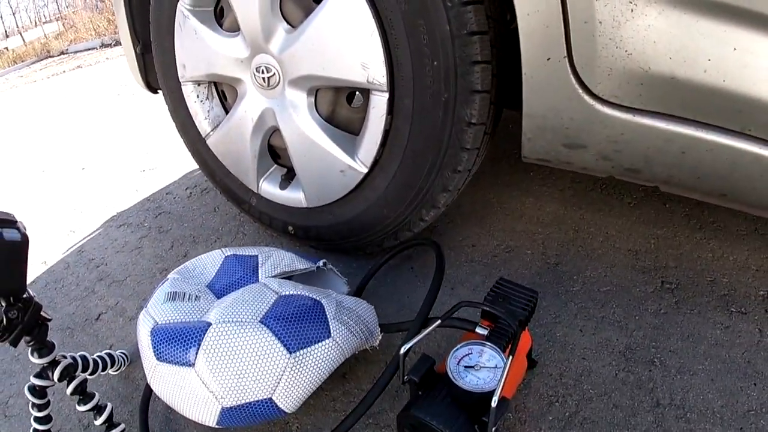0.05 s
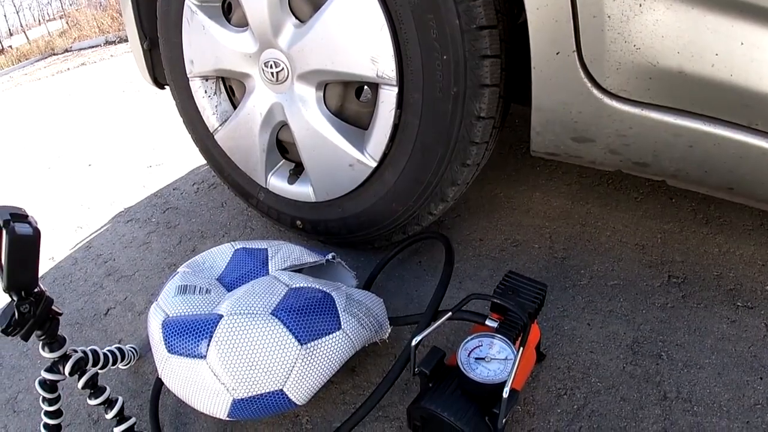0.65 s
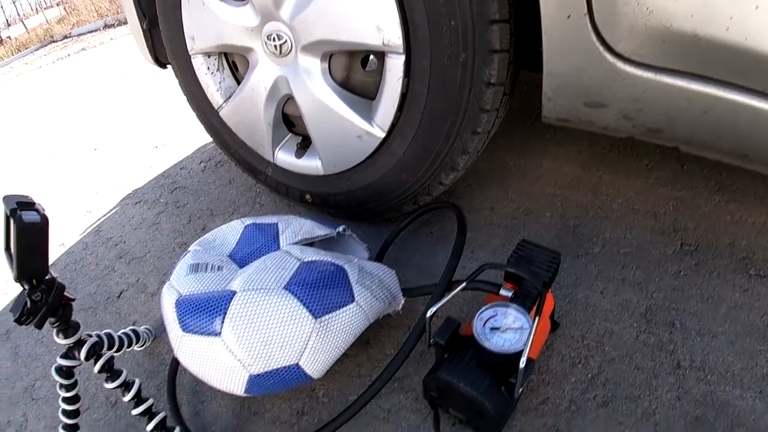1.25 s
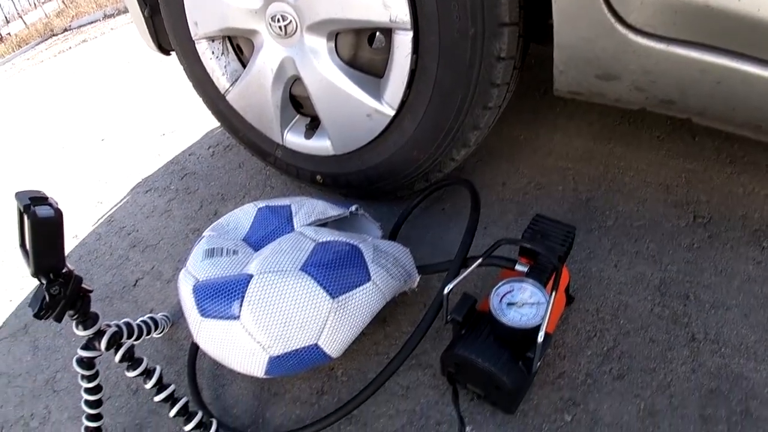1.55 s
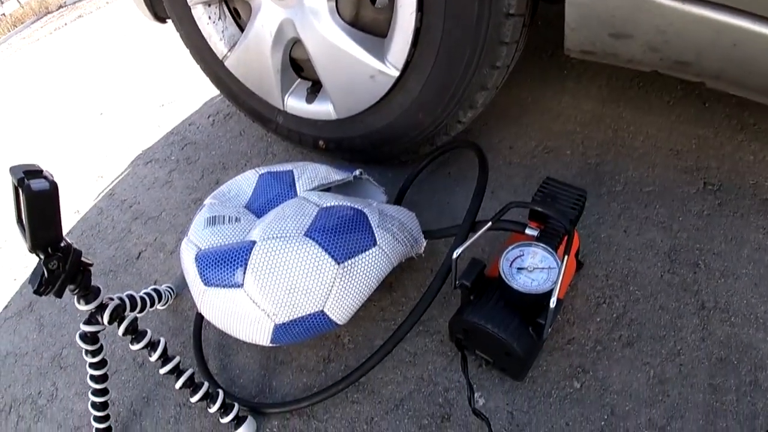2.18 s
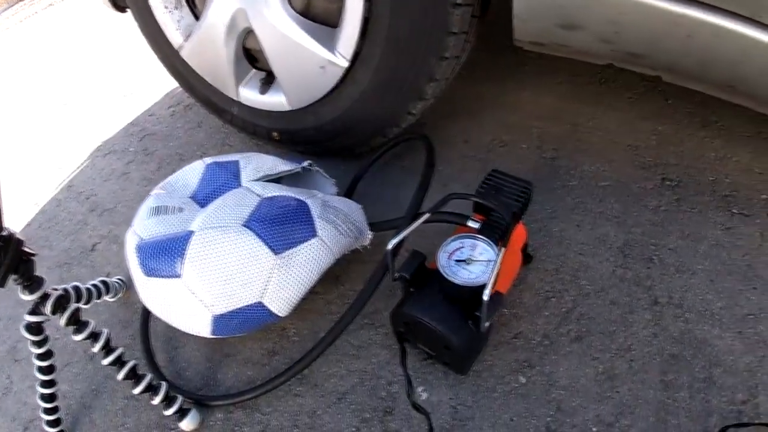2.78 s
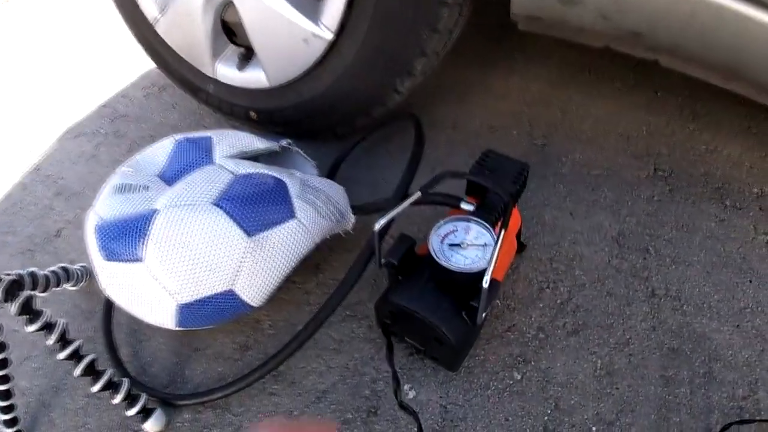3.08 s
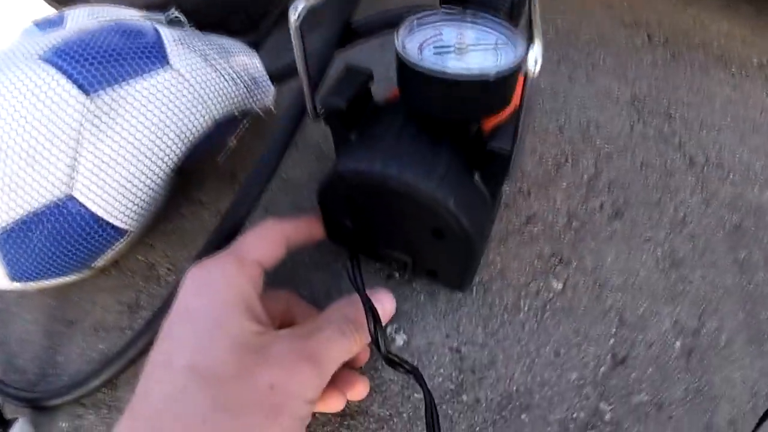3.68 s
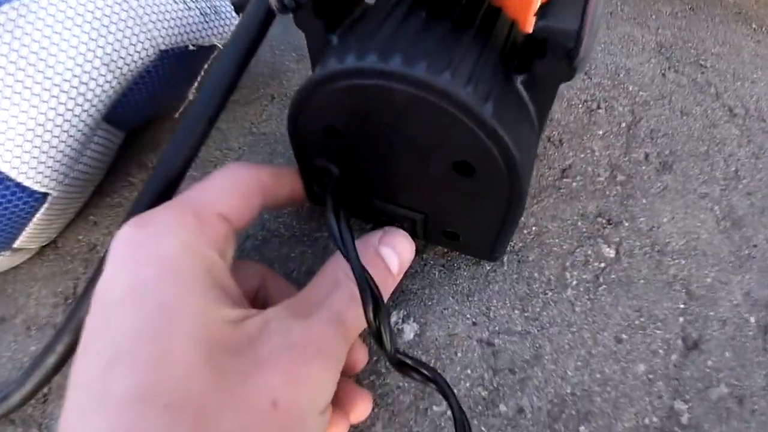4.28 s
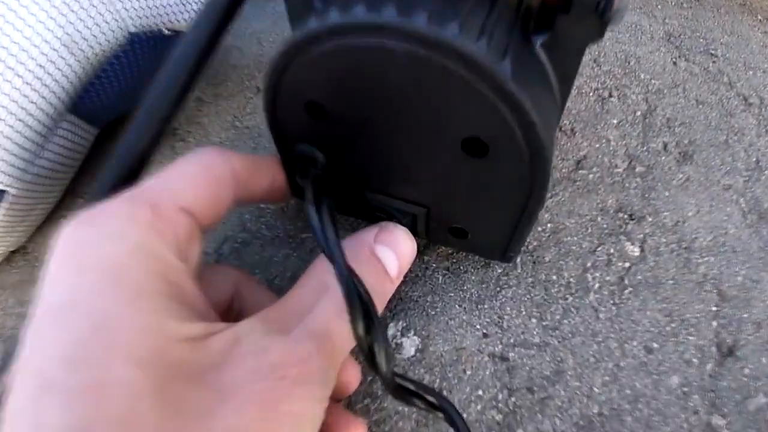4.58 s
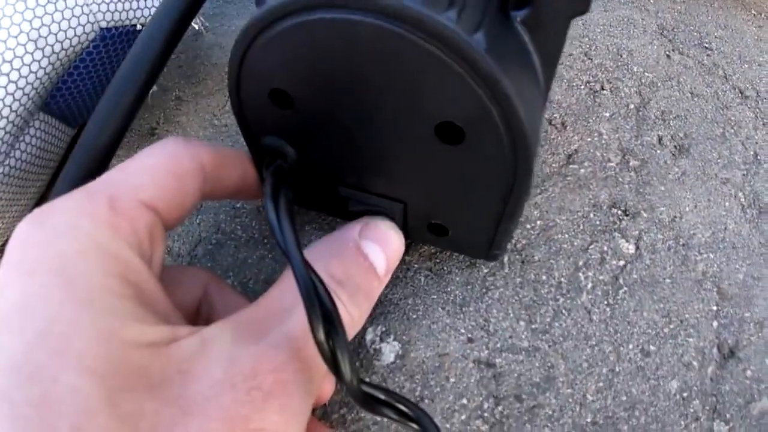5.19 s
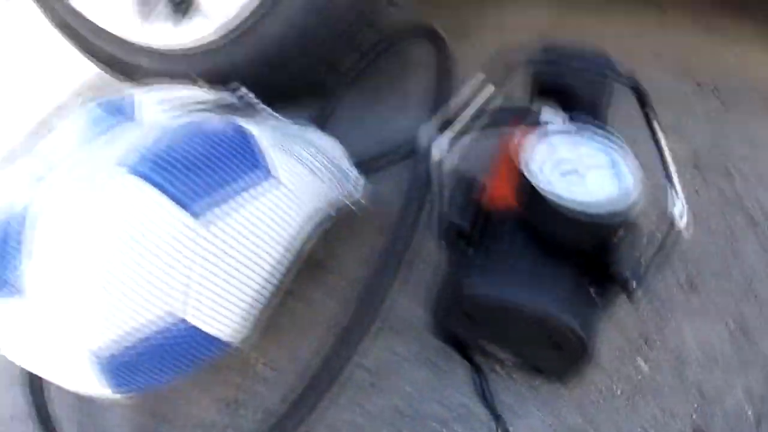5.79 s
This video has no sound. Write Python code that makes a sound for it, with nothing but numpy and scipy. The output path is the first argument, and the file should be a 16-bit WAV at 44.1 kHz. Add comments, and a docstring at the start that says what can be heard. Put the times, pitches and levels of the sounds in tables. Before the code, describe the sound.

A small air compressor drones loudly and rattles, grows closer, then clicks off and quickly winds down to a faint outdoor hum.

```python
"""On asphalt beside a car: a small piston tyre inflator runs at about 66 strokes a second.
Each stroke pushes air, slaps a valve and rings the housing, over a rasp of air and gears and the
rattle of a loose part. The microphone moves round the pump and closes in. A rocker switch clicks,
the piston coasts for a few hooting strokes, and a faint outdoor hum is left."""
import sys
import numpy as np
from scipy import signal
from scipy.fft import rfft, irfft, next_fast_len
from scipy.io import wavfile
from scipy.ndimage import map_coordinates

SR = 44100
rng = np.random.default_rng(int(sys.argv[2]) if len(sys.argv) > 2 else 0)


def put_to_file(sound):
    """Save the sound as 16-bit audio at rate SR, in the file named by the first command-line argument."""
    columns = np.atleast_2d(sound).T  # one column per channel
    safe = np.clip(columns, -1, 1)
    whole_steps = np.round(safe * 32767)
    wavfile.write(sys.argv[1], SR, whole_steps.astype(np.int16))


N = 257984
TIME = np.arange(N) / SR
SLAP_ANCHOR_S, COAST_FROM_S, OFF_S = 2.307, 4.9282, 4.941
STALL_HZ, VALVE_LIFT_HZ = 13, 25  # stroke rates: piston sticks, valve stops lifting
PUFF_DELAY_S = .0005

# wind buffet spectrum: freq_hz, density_db
WIND_SPECTRUM = [(7.1, -20), (12, 1), (27, -16.5), (38, -4.5), (54, -12), (153, -19.5), (182, -24.5),
                 (239, -26), (300, -31), (390, -60), (660, -120)]
# background hiss spectrum: freq_hz, density_db
HISS_SPECTRUM = [(88, -40), (150, -10.5), (317, -22), (356, -4.5), (432, -12), (659, -6.5), (1030, -14),
                 (1660, -13), (2950, -17.5), (3650, -19), (5680, -21.5), (8180, -25), (10900, -31.5),
                 (12000, -37), (14800, -47)]
# background hiss level, swelling after the pump stops: time_s, level_db
HISS_LEVEL = [(0, -64.5), (4.9, -54), (5.25, -48), (5.85, -43.5)]
# faint rings in the hiss: centre_hz, half_width_hz, gain_db
HISS_MODES = [(1650, 64, 5), (7900, 54, -18), (11100, 160, -28)]
# distant machine: pitch_hz, level_db
HUM_TONES = [(355.3, -56.5), (592.2, -60), (672.9, -57), (834.4, -58), (1120, -66), (1550, -63)]
# switch clicks: start_s, level_db, t60_s
SWITCH_CLICKS = [(4.939, -25, .004), (4.9403, -10, 0.0105), (4.9428, -23, 0.0046)]
# plastic switch case spectrum: freq_hz, density_db
SWITCH_SPECTRUM = [(880, -30), (1500, -17), (1910, 4), (2310, -19), (2850, 0), (3910, -11), (5800, 0.5),
                   (6700, -10), (8110, -1), (9930, -23), (11600, -5), (13000, -20), (14800, -35)]
# intake air spectrum: freq_hz, density_db
INTAKE_SPECTRUM = [(200, -40), (500, -16), (820, 2), (1200, -16), (1700, -16), (4000, -44), (12000, -70)]
# piston scrape spectrum: freq_hz, density_db
SCRAPE_SPECTRUM = [(1500, -14), (3200, -5), (3950, 9), (4700, -7), (5600, -1), (6800, -5), (8500, 0),
                   (10500, 0), (14500, -21)]
# crank speed under power: time_s, stroke_rate_hz
CRANK_SPEED = [(0, 66.52), (2.6, 66.51), (3.2, 66.6), (4.5, 66.66)]
# microphone path: time_s, place (0 shaded from the pump head, 1 in line with it, 2 close to the motor)
MIC_PATH = [(.5, 0.11), (.95, 0.24), (1.3, 0.64), (1.8, 0.91), (3.3, 1.25), (3.8, 1.61), (4.7, 1.92)]
# pump mix along that path: time_s, throb_db, valve_db, rasp_db
PUMP_GAINS = [(0, -18, 34, -18), (1.16, -19.5, 32, -17.5), (3.2, -19.5, 33, -15.5), (3.7, -18.5, 33, -17),
              (4.9, -18, 33, -19)]
# loose part's tick strength: time_s, gain_db
RATTLE_GAIN = [(0, -31), (1.5, -13.5), (2.6, -11), (3.3, -0.5), (4.9, -4)]
# loose crank parts: centre_hz, half_width_hz, gain_db
LINKAGE_MODES = [(2830, 87, -10), (3520, 180, -4.5), (3957, 160, 4), (4330, 80, -2), (5700, 220, -12)]
# drive gear: centre_hz, half_width_hz, shaded_db, in_line_db, close_db
GEAR_MODES = [(1407, 35, -30, -6.5, 5.5), (1590, 42, -11, -8.5, 5.5), (1793, 33, -12, 0, -22),
              (1938, 92, -19, -2, -15)]
# finned cylinder: centre_hz, half_width_hz, gain_db
FIN_MODES = [(4720, 30, -2), (5720, 210, -5), (6970, 190, 0), (8320, 45, -15), (9810, 55, -11),
             (11200, 110, -17), (12700, 90, -9)]
# air and gear rasp: centre_hz, half_width_hz, shaded_db, in_line_db, close_db
RASP_MODES = [(496, 380, -3, -2.5, 5.5), (725, 64, -18, -6.5, 3), (1340, 280, -10.5, -2, 2.5),
              (1565, 225, -23, -3.5, -0.5), (1840, 240, -22, -4.5, -14.5), (2650, 500, -14, -13.5, -27),
              (2959, 28, -6, -4.5, 2.5), (3540, 940, -49, -52.5, -6), (4390, 630, -27.5, -9.5, -47),
              (5170, 140, -39, -12.5, -20), (5713, 470, -29, -12, -9), (6550, 740, -34, -27, -15.5),
              (7170, 166, -33.0, -10.5, -16), (8112.0, 800, -42, -20.0, -15), (8530, 260, -50, -18.5, -27),
              (9900, 920, -49, -23.5, -18), (11150, 700, -51.0, -18, -19.5), (12200, 1400, -42, -30, -26.5)]
# pressure wave: harmonic_number, gain_db
THROB_HARMONICS = [(1, 1), (2, 1), (3, -9), (4, -9), (5, -13.5), (6, -14.5), (7, -13.5), (8, -18.5)]
# head cavity (first four rows), then shell: centre_hz, half_width_hz, shaded_db, in_line_db, close_db
HOUSING_MODES = [(664, 129, -20.5, -15, -11), (763, 62, -10.5, -4.0, -9), (824.5, 43.2, -36, -15.5, 2.5),
                 (1023, 173, -36, -23.5, -24), (1365, 68, -78, -47, -24.5), (1608, 57, -39, -15, -13.5),
                 (1798, 7.8, -30, -14.5, -28), (1949, 41, -31.5, -14.5, -30), (2250, 270, -40.5, -28, -42),
                 (2528, 70, -28.5, -18.5, -29.5), (2746, 56, -35, -24.5, -26), (2862, 41, -33, -22.5, -21),
                 (3660, 670, -57.5, -61, -34), (4570, 150, -57, -46, -74), (5620, 154, -53, -32.5, -43)]


def amp(db):
    """Decibels to gain."""
    return 10 ** (np.asarray(db) / 20)


def unit(x):
    """Scale to rms 1."""
    return x / np.sqrt(np.mean(x ** 2) + 1e-20)


def curves(rows):
    """Per-sample curve for each column after time_s."""
    times_s, *columns = np.transpose(rows)
    return [np.interp(TIME, times_s, column) for column in columns]


def wobble(rate_hz):
    """Smooth random curve, rate_hz knots a second."""
    return map_coordinates(rng.standard_normal(int(N * rate_hz / SR) + 4), [TIME * rate_hz])


def bell(x, centre, spread):
    """Gaussian hump, 1 at the centre."""
    return np.exp(-((x - centre) / spread) ** 2)


def filtered(x, response):
    """Filter x by the gain response(hz)."""
    size = next_fast_len(N + 8192)
    return irfft(rfft(x, size) * response(np.fft.rfftfreq(size, 1 / SR)), size)[:N]


def noise(spectrum):
    """Shaped noise, rms 1."""
    freq_hz, db = np.transpose(spectrum)
    white = rng.standard_normal(N)
    return unit(filtered(white, lambda hz: amp(np.interp(np.log(hz + 1), np.log(freq_hz), db))))


def pulses(times_s, sizes):
    """Sub-sample impulses: windowed sincs."""
    at = times_s[:, None] * SR
    taps = np.floor(at).astype(int) + np.arange(-7, 9)
    shape = np.sinc(taps - at) * np.cos(np.pi * (taps - at) / 16) ** 2
    return np.bincount(np.clip(taps, 0, N).ravel(), (sizes[:, None] * shape).ravel(), N + 1)[:N]


def ring(drive, modes, low_hz, size=8192):
    """Drive steep-sided resonances that radiate little below low_hz."""
    centre_hz, half_width_hz, db = np.transpose(modes)
    hz = np.fft.rfftfreq(size, 1 / SR)
    peaks = amp(db)[:, None] / (1 + ((hz - centre_hz[:, None]) / half_width_hz[:, None]) ** 2)
    gain = np.linalg.norm(peaks, axis=0) * hz ** 4 / (hz ** 4 + low_hz ** 4)
    cepstrum = irfft(np.log(gain + 1e-5))
    cepstrum[1:size // 2] *= 2  # fold to minimum phase
    cepstrum[size // 2 + 1:] = 0
    impulse = irfft(np.exp(rfft(cepstrum)))[:size // 2]
    return signal.fftconvolve(drive, impulse)[:N]


def radiate(drive, modes, place, low_hz):
    """Resonances crossfaded between the three microphone places."""
    modes = np.array(modes)
    weights = [np.maximum(1 - abs(place - k), 0) for k in range(3)]
    return sum(weight * ring(drive, modes[:, [0, 1, 2 + k]], low_hz) for k, weight in enumerate(weights))


def background(wind_db=-35.5, gust_db=0.5, rings_db=-58.5):
    """Light wind on the microphone, swelling hiss, faint rings, a far machine's wavering hum."""
    hum = sum(np.sqrt(2) * amp(db) * np.sin(2 * np.pi * hz * TIME + .5 * wobble(11))
              for hz, db in HUM_TONES)
    rings = amp(rings_db) * unit(ring(rng.standard_normal(N), HISS_MODES, low_hz=800))
    wind = amp(wind_db + gust_db * wobble(rate_hz=5.4)) * noise(WIND_SPECTRUM)
    hiss = amp(curves(HISS_LEVEL)[0]) * noise(HISS_SPECTRUM)
    return wind + hum + rings + hiss


def rocker_switch():
    """The rocker tips, then snaps home in its dead plastic case."""
    envelope = sum(amp(db - 60 * np.maximum(TIME - start_s, 0) / t60_s) * (TIME >= start_s)
                   for start_s, db, t60_s in SWITCH_CLICKS)
    return envelope * noise(SWITCH_SPECTRUM)


def crank_knocks(strokes_s, rates_hz):
    """Slack in the coasting crank: each turn bumps the housing and rings the linkage."""
    blows = pulses(strokes_s, amp(1.5) * bell(rates_hz, centre=36, spread=14.3))
    bump = ring(blows, [(330, 260, 12), (1500, 420, 1)], low_hz=118)
    return bump + amp(3) * ring(blows, LINKAGE_MODES, low_hz=2000)


def coasting_piston(strokes_s, rates_hz, hoot_hz=831, hoot_db=-12, intake_db=-26.5, scrape_db=-40.5):
    """Unpowered strokes draw air in, then hoot the valve; the piston scrapes to rest."""
    hoots, suction, friction = np.zeros((3, N))
    for stroke_s, rate_hz in zip(strokes_s, rates_hz):
        turns = (TIME - stroke_s) * rate_hz
        flow = (rate_hz > VALVE_LIFT_HZ) * bell(rate_hz, centre=39.8, spread=16)
        slide = bell(turns, centre=-.12, spread=.16)
        tone = np.sin(2 * np.pi * hoot_hz * (TIME - stroke_s - PUFF_DELAY_S))
        hoots += flow * bell(turns, centre=.31, spread=.17) * tone
        suction += flow * slide
        friction += bell(rate_hz, centre=26, spread=13) * slide
    intake = suction * noise(INTAKE_SPECTRUM)
    scrape = friction * noise(SCRAPE_SPECTRUM)
    return amp(hoot_db) * hoots + amp(intake_db) * intake + amp(scrape_db) * scrape


def rattle(strokes_s, beat_hz=5.97, sag_hz_per_s=.13, crest_s=3.49, depth_db=6, scatter_db=0.9,
           jitter_s=.00011, bounce_s=.0026):
    """A loose part ticks and bounces each stroke, coming and going in slow beats."""
    size_draw, time_draw, bounce_draw = rng.standard_normal((len(strokes_s), 3)).T
    from_crest_s = strokes_s - crest_s
    beats = beat_hz * from_crest_s - sag_hz_per_s * from_crest_s ** 2 / 2
    looseness = np.tanh(2.3 * np.cos(2 * np.pi * beats) + 0.5)
    trend_db = np.interp(strokes_s, *np.transpose(RATTLE_GAIN))
    sizes = amp(trend_db + depth_db * looseness + scatter_db * size_draw)
    ticks_s = strokes_s - .0004 + jitter_s * time_draw
    rebounds_s = ticks_s + bounce_s * np.exp(0.28 * bounce_draw)
    ticks = pulses(ticks_s, sizes) + pulses(rebounds_s, 0.5 * sizes)
    return ring(ticks, LINKAGE_MODES, low_hz=2000)


def backlash(strokes_s, place, delay_s=.0067, scatter_db=4, jitter_s=.00014):
    """Gear teeth change sides, unevenly, as the piston turns to compress again."""
    time_draw, size_draw = rng.standard_normal((len(strokes_s), 2)).T
    taps = pulses(strokes_s + delay_s + jitter_s * time_draw, amp(scatter_db * size_draw))
    return amp(9) * radiate(taps, GEAR_MODES, place, low_hz=1020)


def rasp(turns, rate_hz, load, place, gain_db, rise_s=.0012, decay_s=.0028, fins_db=-35):
    """Air spits through the valve each stroke over grinding gears and brushes; the fins ring."""
    since_open_s = (turns + 0.13) % 1 / np.maximum(rate_hz, 1)
    spit = 2 * (1 - np.exp(-since_open_s / rise_s)) * np.exp(-since_open_s / decay_s)
    grind = np.sqrt(.3 + spit ** 2) * load ** 0.67 * rng.standard_normal(N)
    decorrelated = grind * rng.choice([-1, 1], N)
    fin_exposure = np.interp(place, [0, 1, 2], [.2, 1, .55])
    fins = amp(fins_db) * fin_exposure * ring(decorrelated, FIN_MODES, low_hz=3000)
    return amp(gain_db) * radiate(grind, RASP_MODES, place, low_hz=510) + fins


def throb(turns, load, level_db, lag_turns=0.056, waver_db=0.11):
    """Pressure builds through the stroke and collapses as the valve shuts: a rounded sawtooth."""
    wave = -sum(amp(db) * np.sin(2 * np.pi * k * (turns - lag_turns)) for k, db in THROB_HARMONICS)
    wave /= wave[:round(OFF_S * SR)].std()
    return wave * amp(level_db + waver_db * wobble(rate_hz=12)) * load ** 1.85


def valve(strokes_s, place, gain_db, jitter_s=.000018, scatter_db=0.5, lead_s=.00022, fade_s=.03):
    """One slap a stroke rings the shell; a puff of air then rings the head cavity."""
    size_draw, time_draw = rng.standard_normal((len(strokes_s), 2)).T
    force = np.exp(-np.maximum(strokes_s - OFF_S, 0) / fade_s)
    times_s = strokes_s + jitter_s * time_draw
    slaps = pulses(times_s - lead_s, force * amp(scatter_db * size_draw))
    puffs = pulses(times_s + PUFF_DELAY_S, force)
    cavity = radiate(puffs, HOUSING_MODES[:4], place, low_hz=416)
    shell = radiate(slaps, HOUSING_MODES[4:], place, low_hz=730)
    return amp(gain_db) * (cavity + shell)


def crank(coast_tau_s=.1424):
    """Near-steady under power, then an exponential run-down until the piston sticks."""
    rate_hz = curves(CRANK_SPEED)[0] * np.exp(-np.maximum(TIME - COAST_FROM_S, 0) / coast_tau_s)
    rate_hz *= rate_hz > STALL_HZ
    turns = np.cumsum(rate_hz) / SR
    turns -= turns[round(SLAP_ANCHOR_S * SR)]
    strokes_s = np.interp(np.arange(np.ceil(turns[0]), turns[-1]), turns, TIME)  # one per whole turn
    return rate_hz, turns, strokes_s


def scene():
    """Mono mix; the crank times every sound of the pump."""
    rate_hz, turns, strokes_s = crank()
    load = np.maximum(rate_hz - STALL_HZ, 0) / (rate_hz.max() - STALL_HZ)
    powered_s, coasting_s = strokes_s[strokes_s < OFF_S], strokes_s[strokes_s > OFF_S]
    coasting_hz = np.interp(coasting_s, TIME, rate_hz)
    place, = curves(MIC_PATH)
    throb_db, valve_db, rasp_db = curves(PUMP_GAINS)
    pump = throb(turns, load, throb_db) + valve(strokes_s, place, valve_db)
    pump += rasp(turns, rate_hz, load, place, rasp_db)
    run_down = crank_knocks(coasting_s, coasting_hz) + coasting_piston(coasting_s, coasting_hz)
    clatter = backlash(powered_s, place) + rattle(powered_s)
    return (pump + clatter + run_down + rocker_switch() + background())[None]


def record(dry):
    """Treble roll-off into a hard band limit."""
    top_hz = 14900
    return filtered(dry[0], lambda hz: (hz < top_hz) * amp(np.interp(hz, [13500, 15000], [0, -5])))[None]


dry = scene()
out = record(dry)
put_to_file(out)
```